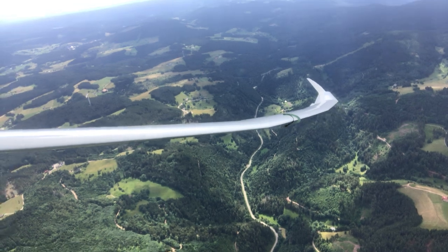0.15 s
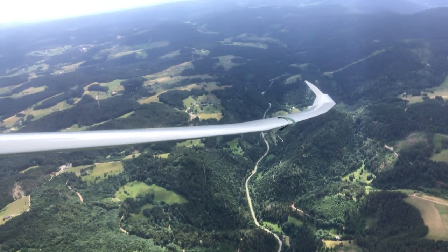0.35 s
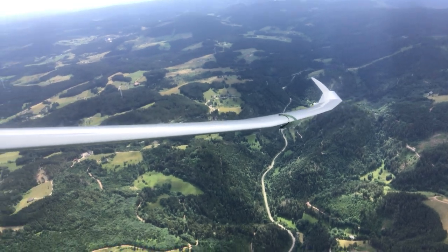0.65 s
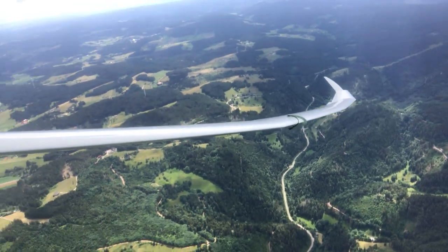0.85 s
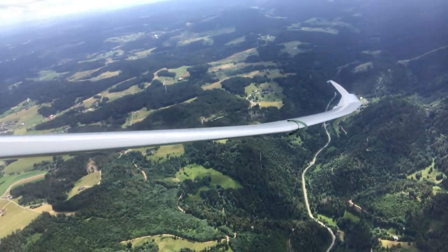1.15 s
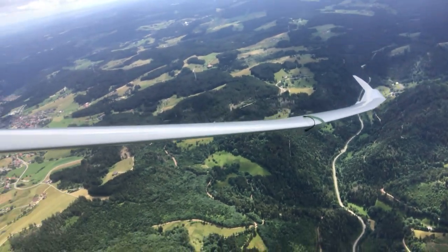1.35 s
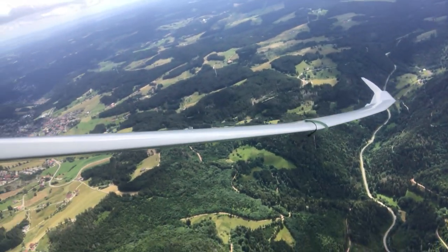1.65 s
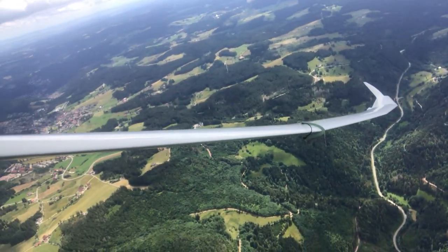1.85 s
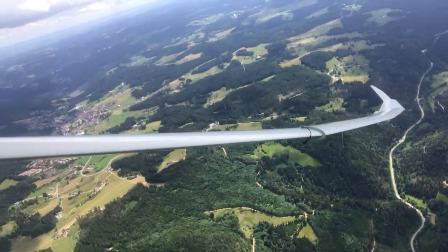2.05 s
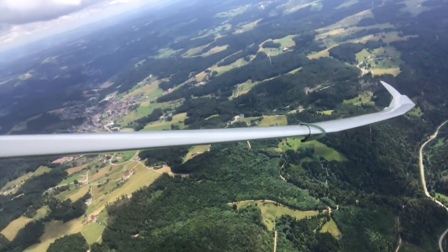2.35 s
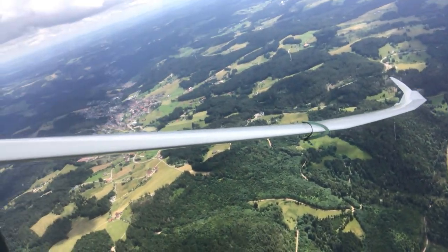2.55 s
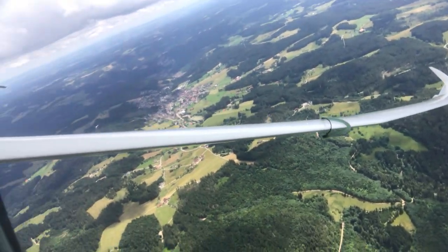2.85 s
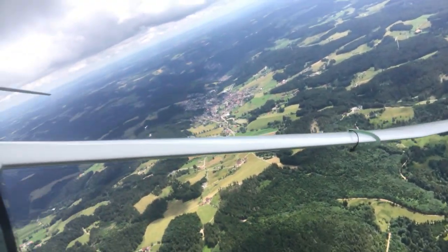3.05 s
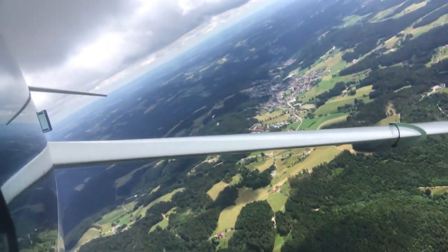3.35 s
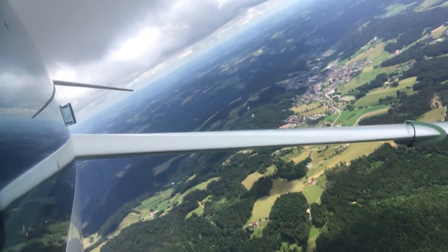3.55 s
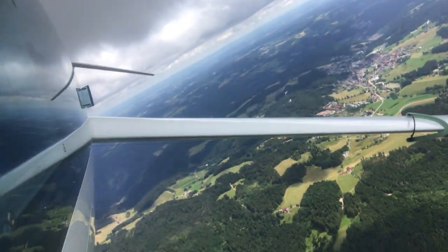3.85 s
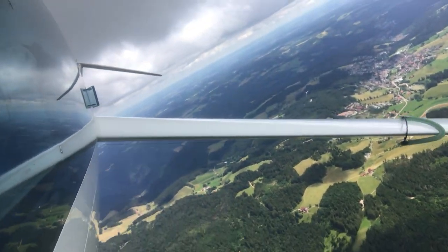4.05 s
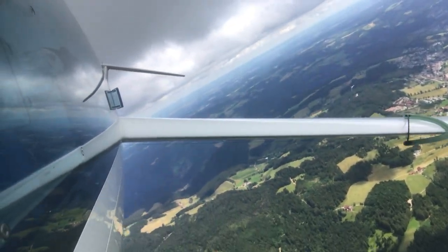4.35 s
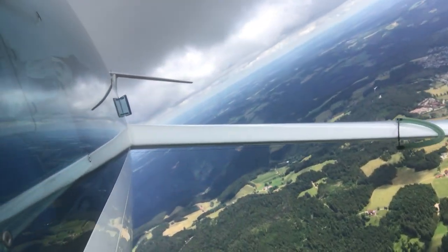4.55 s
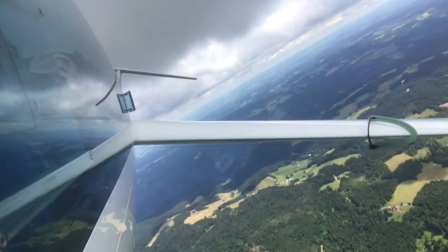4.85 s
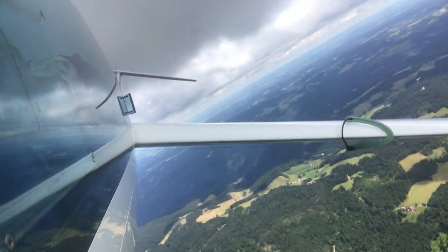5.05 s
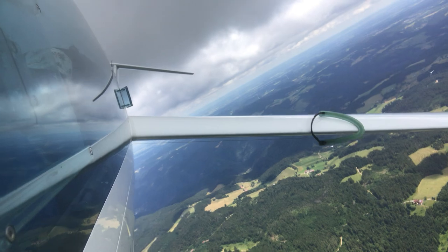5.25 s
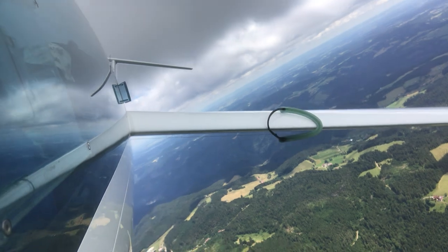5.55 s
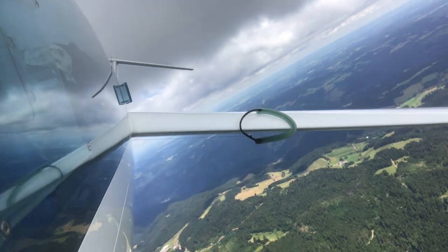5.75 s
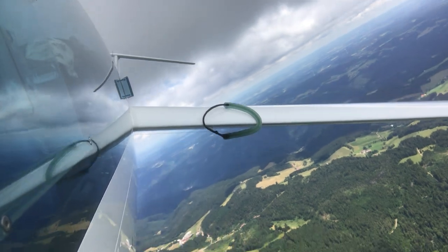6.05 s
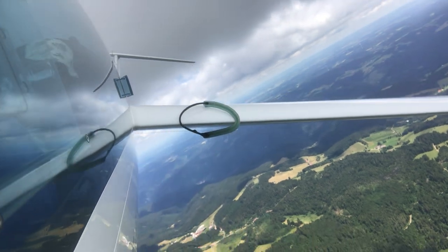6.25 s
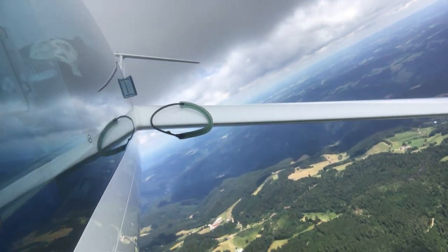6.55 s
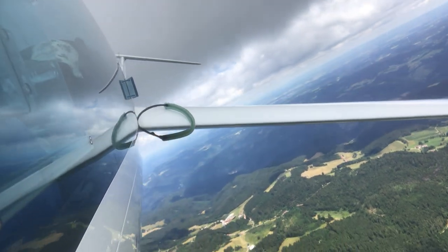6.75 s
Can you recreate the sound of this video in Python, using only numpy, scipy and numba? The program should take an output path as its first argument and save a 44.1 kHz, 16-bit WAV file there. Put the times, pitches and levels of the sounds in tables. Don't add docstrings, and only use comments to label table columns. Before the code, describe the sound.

Inside a flying glider, draught from a vent thuds and flutters directly on a phone microphone. The thumps thin out, then short puffs sputter and a loud, tearing air blast hits, drops briefly and returns as a bright hiss. It cuts off abruptly to near quiet; low buffeting and a steady soft rush of airflow rise, with dull frame ticks.

```python
import sys
import numpy as np
from scipy import signal
from scipy.io import wavfile
from scipy.ndimage import uniform_filter1d, minimum_filter1d
from numba import njit

SR = 44100
rng = np.random.default_rng(int(sys.argv[2]) if len(sys.argv) > 2 else 0)


def materialize(psi):
    bounded = np.clip(np.atleast_2d(psi).T, -1, 1)
    quanta = np.round(bounded * 32767).astype(np.int16)
    wavfile.write(sys.argv[1], SR, quanta)


def invert_db(x):
    u = np.asarray(x, float) / 20
    return 10 ** u


N = 303849
TIME = np.arange(N) / SR
STEPS = TIME[::16]


def curve(table, column=1):
    rows = np.array(table, float)
    return np.interp(TIME, rows[:, 0], rows[:, column])


def fine(control):
    return np.interp(TIME, STEPS, control)


@njit
def svf(x, warp, damp, low):
    y, b, l = np.empty(len(x)), 0., 0.
    for i in range(len(x)):
        g = warp[i]
        v = (b + g * (x[i] - l)) / (1 + g * (g + damp))
        y[i] = l + g * v if low else damp * v
        b, l = 2 * v - b, l + 2 * g * v
    return y


def band(x, hz, damp, low=False):
    warp = np.tan(np.pi * np.clip(hz, 10, .45 * SR) / SR) + 0 * TIME
    return svf(x, warp, float(damp), low)


def even(x, span_s=.15):
    power = uniform_filter1d(x ** 2, int(span_s * SR))
    return x / np.sqrt(power + 1e-12)


def walk(rate):
    hold = int(SR / rate)
    steps = rng.standard_normal(4001)[np.arange(N) // hold]
    smooth = uniform_filter1d(uniform_filter1d(steps, hold), hold)
    return smooth / smooth.std()


def kicks(per_s, scatter_db):
    when, size, sign = rng.random(N), rng.exponential(1, N), rng.standard_normal(N)
    return (when < per_s / SR) * np.sign(sign) * invert_db(scatter_db * size)


def swells(trend, events):
    bells_db = sum(db * np.exp(-((STEPS - s) / half_s) ** 2) for s, db, half_s in events)
    return curve(trend) + fine(bells_db)


def burst(s, length_s):
    half_s = length_s / 2
    return fine(np.exp(-((STEPS - s - half_s) / (half_s + 1e-4)) ** 4))


# (time [s], level [dB], tilt [dB per octave])
RUSH_LEVEL = [(3.17, -51, 1), (3.49, -46, -0.2), (4.23, -34, 0.3), (4.59, -34.5, 0), (5.05, -34.5, 0),
              (5.55, -31.5, -0.3), (5.89, -33.5, -0.1), (6.29, -31, -0.4), (6.89, -33, 0)]
# (frequency [Hz], density [dB per Hz])
RUSH_SPECTRUM = [(400, -22), (809, -2.5), (1900, -16.5), (5000, -25), (6580, -23), (10400, -31.5),
                 (13900, -27), (15500, -34)]


def airframe():
    ducked_db = -59
    hz, db = np.transpose(RUSH_SPECTRUM)
    out, swell = 0, walk(14)
    for centre_hz in 500 * 2 ** np.arange(0, 5.1, .5):
        air = band(band(rng.standard_normal(N), centre_hz, 0.85), centre_hz, 0.85)
        colour_db = np.interp(np.log(centre_hz), np.log(hz), db)
        colour_db = colour_db + curve(RUSH_LEVEL, 2) * np.log2(centre_hz / 3000)
        out = out + air * invert_db(colour_db + .3 * swell + .8 * walk(20))
    scale = band(out, 2450, 3.75).std()
    return out / scale * invert_db(np.where(TIME < RUSH_LEVEL[0][0], ducked_db, curve(RUSH_LEVEL)))


# (time [s], peak [dB], length [s])
FRAME_TICKS = [(0.233, -31, 0.004), (3.19, -33, 0.0036), (3.203, -29, 0.004), (3.216, -30, 0.003),
               (3.22, -33, 0.0035), (3.229, -31, 0.004), (3.24, -26, 0.0046), (3.247, -28, 0.0043),
               (4.925, -24, 0.0035), (4.932, -16, 0.0032), (5.164, -25, 0.0036), (5.397, -22, 0.0036),
               (5.603, -20, 0.0034), (5.6694, -20, 0.0032), (5.741, -17.5, 0.004), (6.255, -17, 0.0043),
               (6.362, -16.5, 0.0029), (6.809, -15, 0.0023), (6.844, -19, 0.004)]


def dull_body(x):
    return band(band(band(x, 1500, 2.6), 4300, 1.3, True), 4500, 1.3, True)


def ticks():
    air = even(dull_body(rng.standard_normal(N)))
    wisps = sum(invert_db(db - 14) * burst(s, length_s) for s, db, length_s in FRAME_TICKS)
    crackle = kicks(90, 2.5) * invert_db(curve(RUSH_LEVEL) + 8.0)
    snaps = crackle * (TIME > RUSH_LEVEL[0][0])
    for s, db, length_s in FRAME_TICKS:
        snaps[int((s + .001) * SR)] += invert_db(db + 17)
    return air * wisps + dull_body(snaps)


# (time [s], level [dB])
BUFFET_TREND = [(0, -18.5), (.25, -26.5), (.8, -28), (1.3, -28), (1.45, -22), (1.68, -19), (1.76, -14.5),
                (2.25, -12), (2.75, -19.5), (3.05, -19), (3.28, -32.5), (3.75, -26), (4.15, -21),
                (4.8, -14.5), (5.4, -19.5), (5.9, -17), (6.7, -14), (6.89, -18.5)]
# (time [s], level over trend [dB], half length [s])
BUFFET_HEAVES = [(.31, -12, 0.044), (0.383, 4.5, .03), (0.793, -6, .03), (1.13, -10, 0.035),
                 (1.233, 8, .03), (1.28, -9, 0.043), (1.403, 8.5, 0.022), (1.473, -18, 0.03),
                 (1.51, 6, .012), (1.534, -15, .014), (1.69, -12, .015), (1.744, 8.5, 0.022),
                 (1.913, 6, .012), (1.95, -13, 0.026), (2.011, -20, 0.016), (2.43, 1.5, 0.054),
                 (3.37, 6, .04), (3.832, 7, 0.037), (4.176, 4, 0.035), (4.25, -5.5, .03),
                 (4.328, 8.5, 0.04), (4.352, -12, 0.021), (4.4, 5, 0.035), (4.62, 0.5, 0.022),
                 (4.917, -7, 0.021), (5.448, 3.5, 0.036), (5.694, 4.5, .07), (6.1, -6, 0.047),
                 (6.257, 5, 0.027), (6.5, -5.5, 0.06)]


def buffet():
    push = kicks(500, 1.2) * invert_db(1.0 * walk(30))
    heave = band(band(push, 55.7, 2.08), 88.6, 1.95)
    return even(heave, 0.063) * invert_db(swells(BUFFET_TREND, BUFFET_HEAVES))


# (time [s], level [dB], eddy pitch [Hz])
EDDY_TREND = [(0, -10.5, 540), (.24, -15.5, 470), (.28, -24, 418), (.45, -26, 325), (.62, -19, 394),
              (.9, -20, 424), (1.13, -20.5, 477), (1.28, -23.5, 360), (1.45, -27.5, 570), (1.7, -20.5, 560),
              (1.76, -12, 470), (2.15, -11, 546), (2.74, -12, 594), (2.9, -17.5, 426), (3.13, -25, 520),
              (3.27, -35.5, 300), (4.5, -25, 298), (6.89, -24, 305)]
# (time [s], level over trend [dB], half length [s])
EDDY_FLURRIES = [(0.138, -4.5, 0.066), (0.221, 4, 0.021), (0.343, -10, 0.0097), (.365, 6.5, .025),
                 (0.417, -3, .03), (0.844, 5.5, 0.018), (0.991, 8, .05), (1.373, 10, 0.044),
                 (1.533, -11, 0.017), (1.573, 3, 0.053), (1.888, -5.5, 0.044), (1.971, -14.5, .055),
                 (2.126, 5, 0.044), (2.29, -2.5, 0.077), (3.438, 5, .05), (3.804, 5.5, .04),
                 (3.86, -8, .02), (3.95, 3, 0.032), (4.03, -6, 0.036), (4.78, 5, 0.11), (4.96, 7, .03),
                 (5.106, -7.5, 0.073), (5.413, -6, 0.06), (5.668, 6, 0.078), (5.756, -6, 0.028),
                 (5.813, 6.5, .025), (6.052, 2, .05), (6.17, -2.5, .07), (6.678, 3.5, 0.12),
                 (6.89, -4.5, .07)]
# (time [s], peak [dB], pitch [Hz])
EDDY_THUMPS = [(0.127, -1, 497), (0.191, 1, 654), (0.221, 12, 550), (0.234, -3, 267), (0.298, -3.5, 516),
               (0.314, -8, 423), (0.354, -11, 318), (0.367, -24, 345), (0.438, -12, 506),
               (0.467, -8.5, 252), (0.552, -11, 600), (0.582, -8, 500), (0.608, -11, 560),
               (0.636, -8.5, 235), (0.719, -8.5, 287), (0.756, -7.5, 568), (0.828, -0.5, 518),
               (0.928, -10, 473), (1.133, 7, 490), (1.172, -9.5, 323), (1.231, -22, 342), (1.265, -12, 370),
               (1.339, -5, 252), (1.553, -12, 620), (3.479, -19, 358), (5.042, -28, 360), (5.606, -11, 366),
               (6.807, -29, 268)]


def eddies():
    edge_calm, edge_jet, edge_per_db = 1.644, 0.9, -0.05
    opening_db, opening_hz = -2.5, 558
    hz = curve(EDDY_TREND, 2) * (1 + 0.055 * walk(30))
    level_db = swells(EDDY_TREND, EDDY_FLURRIES)
    rush_gain = jet_on_port()[0][0]
    under_jet = np.clip(np.log10(rush_gain) + 2.66, 0, 1.3)
    edge = edge_calm + edge_jet * under_jet + edge_per_db * (level_db - curve(EDDY_TREND))
    edge_hz = hz * np.clip(edge, 1, 4)
    push = kicks(1100 * invert_db(.6 * (level_db + 24)), 1.3) * invert_db(2.0 * walk(50))
    blips = band(push, hz, 1.45)
    blips = band(band(blips, edge_hz, 2.26, True), 1.36 * edge_hz, 1.34, True)
    out = even(blips, 0.069) * invert_db(level_db)
    out -= invert_db(opening_db) * np.cos(2 * np.pi * opening_hz * TIME) * np.exp(-TIME / 0.0078)
    for s, db, pitch_hz in EDDY_THUMPS:
        cycles = np.arange(1500) / SR * pitch_hz
        envelope = np.exp(-((cycles - 1.7) / .95) ** 2) * np.minimum(2 * cycles, 1) ** 2
        out[int(s * SR):][:1500] += invert_db(db - 3) * np.sin(2 * np.pi * cycles) * envelope
    return out


# (time [s], peak [dB], length [s], top over the body [dB])
JET_PUFFS = [(1.5, -50, 0.005, -37), (1.563, -40, 0.005, -29), (1.641, -38, 0.0056, -30),
             (1.7, -25, 0.0023, -23), (1.71, 2.5, 0.0018, -24), (1.734, -7.5, 0.0038, -20.5),
             (1.755, -0.5, 0.012, -20), (1.7846, 11, 0.0077, -12.5), (1.813, -0.5, 0.0028, -19),
             (1.838, -5, 0.0091, -13), (1.862, -8, 0.0055, -22), (1.879, -2, 0.0031, -25),
             (1.896, 9, 0.006, -19), (1.905, -22, 0.004, -22), (1.919, -17, 0.005, -20),
             (1.922, -22, 0.0043, -25), (1.941, -19, 0.0039, -18), (1.9605, -12.5, 0.0028, -14),
             (1.972, -10, 0.005, -19), (1.9706, 3, 0.0023, -14), (2.034, -14.5, 0.0044, -7.5),
             (2.054, -11.5, 0.005, -17)]
# (start [s], end [s], pitch [Hz], level [dB])
EDGE_TONES = [
    (2.09, 2.195, 1256, -7),
    (2.686, 2.766, 910, -9.5),
    (2.727, 2.802, 1426, -14.5),
]


def puffs():
    dull = even(band(band(rng.standard_normal(N), 2100, 1.8), 6200, 2.3, True))
    bright = even(band(band(rng.standard_normal(N), 9000, 1.3), 9000, 1.5))
    out = 0
    for s, db, length_s, top_db in JET_PUFFS:
        out = out + (dull + bright * invert_db(top_db)) * invert_db(db - 5) * burst(s, length_s)
    for start, end, hz, db in EDGE_TONES:
        tone = even(band(rng.standard_normal(N), hz, 0.087))
        swell = np.sin(np.pi * np.clip((TIME - start) / (end - start), 0, 1))
        out = out + invert_db(db) * tone * swell
    return out


# (peak time [s], rush [dB], rise [s per 20 dB], fall [s per 20 dB], top over the rush [dB])
FRINGE_LICKS = [(.035, -31, 0.043, .04, -15.5), (.12, -33, 0.1, 0.084, -31), (.18, -29, 0.089, .06, -34),
                (.232, -40, 0.036, 0.023, -17.5), (.55, -55, 0.46, .8, -12), (1.0, -41, .08, .17, -30),
                (1.345, -23, .028, .14, -29), (1.393, -19, .08, .017, -19), (1.503, -34, .015, 0.028, -28),
                (1.567, -30, 0.024, .035, -21), (1.61, -42, .06, .15, -25), (1.645, -29, 0.028, 0.023, -22)]
# (time [s], rush [dB], aim as top over the rush [dB]; low = grazing the edge)
BLAST_ONE = [
    (1.69, -60, -14.5),
    (1.71, -16.5, -9),
    (1.72, -7.5, -12.5),
    (1.91, -17.5, -9),
    (1.92, -24.5, -13.5),
    (1.96, -26.5, -20),
    (1.98, -23, -5),
    (1.99, -20.5, -17),
    (2.025, -24.5, -11),
]
# (time [s], rush [dB], aim as top over the rush [dB])
BLAST_TWO = [
    (2.05, -11.5, -3),
    (2.15, -8.5, -24),
    (2.21, -18, 4),
    (2.625, -13.5, -2.5),
    (2.665, -13.5, -29),
    (2.76, -10.5, -25),
    (2.805, -19, 2.5),
    (3.07, -21.5, -12),
    (3.135, -22.5, -33.5),
]
DRAUGHT_LEAK_DB = (-66, -72, -81)
LICK_SLOPES = (1, 1.6, 1.8)


def jet_on_port():
    leave_db_per_s, grazing_db = 398, -14.5
    lick_hiss_db, lick_hiss_per_top = -7, 0.71
    first_hiss_db, second_hiss_db, blast_hiss_per_top = -7.5, 2, 0.45
    lick_speed, blast_speed, speed_per_db = .85, .96, .003
    s, db, aim = np.transpose(BLAST_ONE + BLAST_TWO)
    outside_s = np.maximum(STEPS - s[-1], 0) + np.maximum(s[0] - STEPS, 0)
    rush_db = np.interp(STEPS, s, db) - leave_db_per_s * outside_s
    aim_db = np.interp(STEPS, s, aim)
    hiss_db = np.interp(STEPS, [BLAST_TWO[0][0], BLAST_TWO[1][0]], [first_hiss_db, second_hiss_db])
    hiss_db += blast_hiss_per_top * np.minimum(aim_db - grazing_db, 0)
    gains = invert_db(rush_db + np.array([0 * STEPS, hiss_db, aim_db]))
    gains = gains + invert_db(np.array(DRAUGHT_LEAK_DB))[:, None]
    slopes = np.array(LICK_SLOPES)[:, None]
    for peak_s, db, rise, fall, top_db in FRINGE_LICKS:
        away = np.maximum((peak_s - STEPS) / rise, (STEPS - peak_s) / fall)
        balance_db = np.array([[0], [lick_hiss_db + lick_hiss_per_top * top_db], [top_db]])
        gains = gains + invert_db(db - 20 * slopes * away) * invert_db(balance_db)
    speed = np.where(STEPS < s[0], lick_speed, blast_speed + speed_per_db * aim_db)
    return [fine(gain) for gain in gains], fine(speed)


# (time [s], depth [dB])
FLAP_DEPTH = [(0, 1.5), (1.3, 1.5), (1.36, 3.5), (1.72, 3), (1.9, 4), (2.05, 3.5), (2.2, 1.2), (3.1, 1),
              (3.2, 3)]


def jet():
    fringe_hz, gone_s = 2300, 3.4
    flap = curve(FLAP_DEPTH) * (walk(380) + .6 * walk(110))
    gains, speed = jet_on_port()
    out = 0
    # centre [Hz], damping, share of the flap
    layers = ((1286, 1.44, 0.62), (3180, 1.9, 0.57), (5350, 2.4, 1.6))
    for layer, (hz, damp, tear) in enumerate(layers):
        moving_hz = hz * np.clip(speed, .6, 1.6)
        air = band(band(rng.standard_normal(N), moving_hz, damp), moving_hz, 0.69 * damp)
        if layer == 0:
            air = np.where(TIME < BLAST_ONE[0][0], band(air, fringe_hz, 1.2, True), air)
        torn = air * invert_db(tear * flap + .8 * walk(35))
        out = out + even(torn, 0.031) * gains[layer]
    return out * np.clip((gone_s - TIME) / .1, 0, 1)


def scene():
    return (buffet() + eddies() + jet() + puffs() + ticks() + airframe())[None]


def low_pass(x):
    return signal.sosfilt(signal.butter(12, 15720, fs=SR, output="sos"), x)


# (centre [Hz], width [Hz], depth [0-1])
DUCT_DIPS = [
    (4960, 640, 0.34),
    (7740, 1100, 0.32),
    (10460, 1950, 0.44),
]
# (time [s], corner
# [Hz])
WIND_CUT = [(0, 35.8), (.3, 58), (1.3, 59), (1.5, 41.4), (3.2, 43), (4.2, 30.2), (6.89, 30)]


def record(dry):
    ceiling = .71
    x = dry[0]
    for hz, width_hz, depth in DUCT_DIPS:
        x = x - depth * band(x, hz, width_hz / hz)
    for share in (1.1, .85):
        corner_hz = share * curve(WIND_CUT)
        x = x - band(x, corner_hz, 1.28, True) - band(x, corner_hz, 1.31)
    gain = np.minimum(1, ceiling / (np.abs(x) + 1e-9))
    held = minimum_filter1d(gain, size=177)
    x = x * uniform_filter1d(uniform_filter1d(held, size=89), size=89)
    return low_pass(x[None])


dry = scene()
out = record(dry)
materialize(out)
```